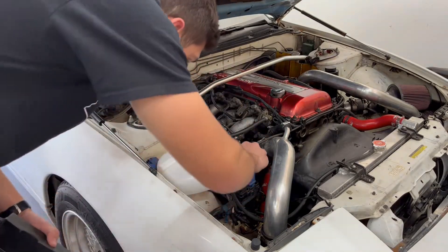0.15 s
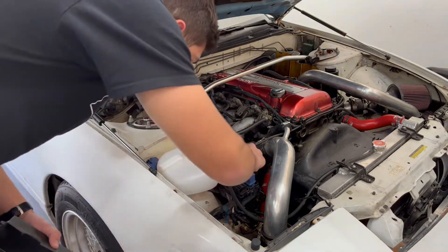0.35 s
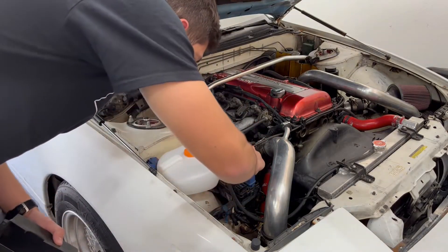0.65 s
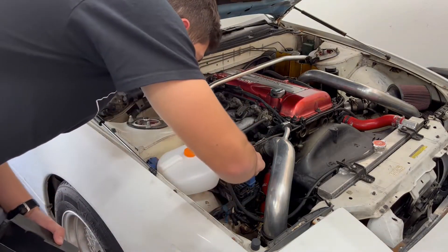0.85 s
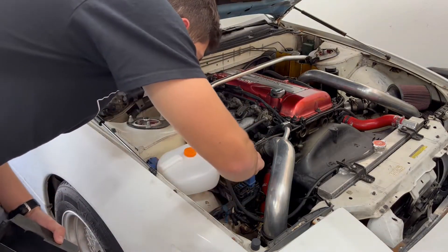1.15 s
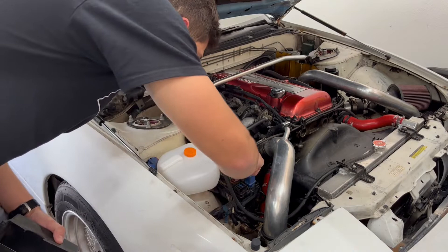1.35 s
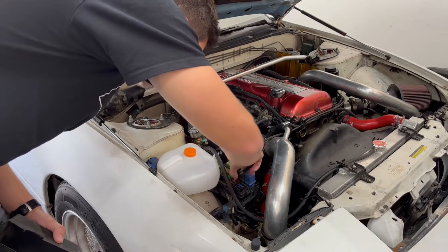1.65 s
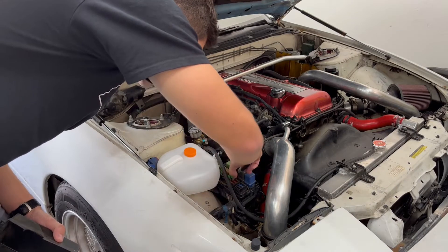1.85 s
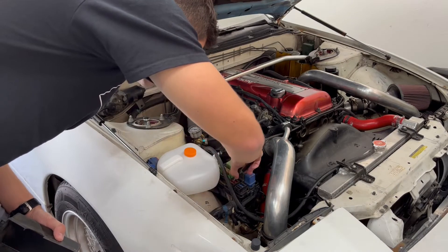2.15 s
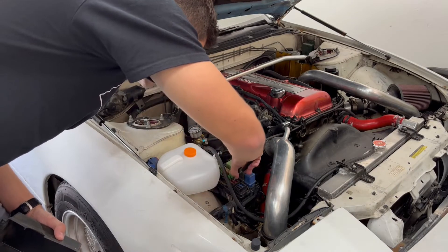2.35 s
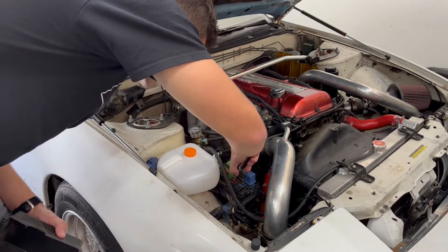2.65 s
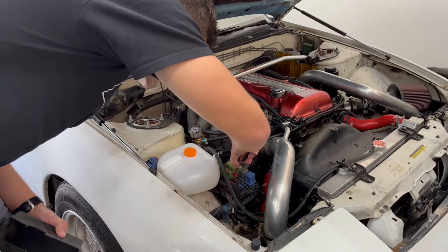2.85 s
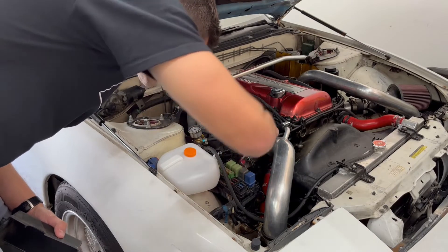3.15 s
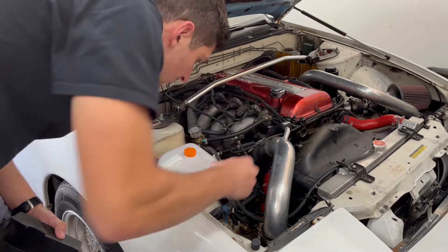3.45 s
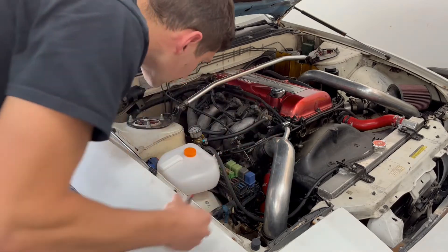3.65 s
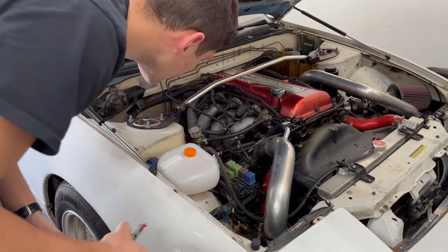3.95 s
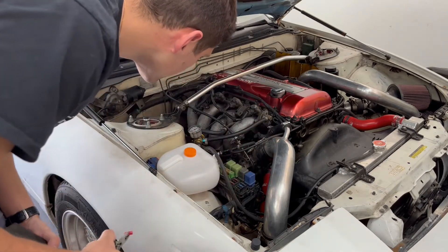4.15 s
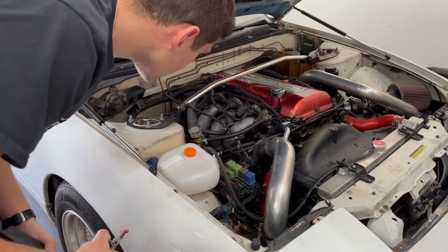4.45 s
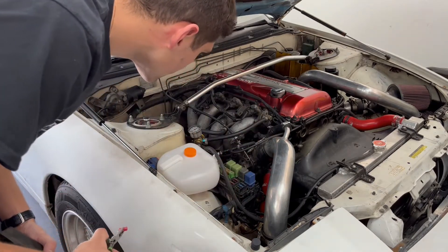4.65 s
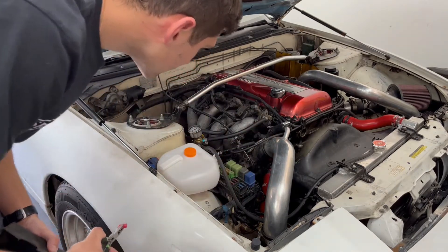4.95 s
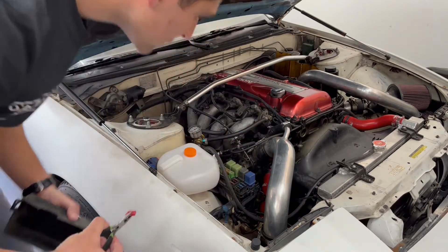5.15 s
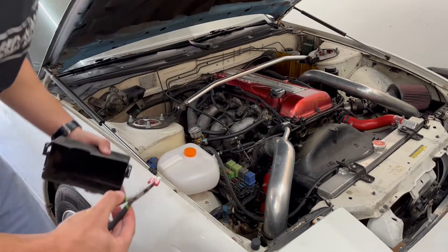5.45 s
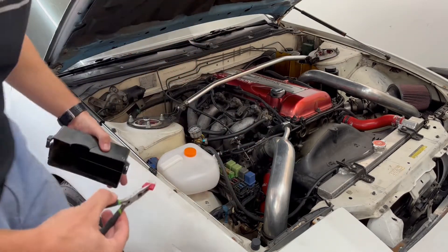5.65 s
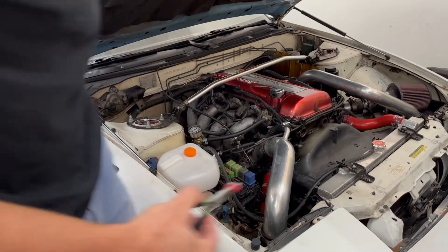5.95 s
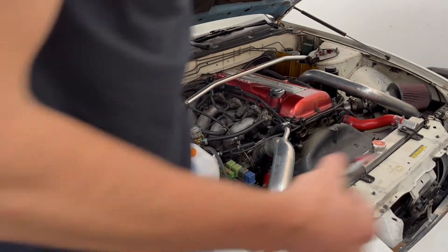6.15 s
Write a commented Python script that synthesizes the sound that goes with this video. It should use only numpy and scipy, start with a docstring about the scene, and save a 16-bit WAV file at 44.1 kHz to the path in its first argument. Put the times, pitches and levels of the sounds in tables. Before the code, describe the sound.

A four-cylinder petrol engine idles in a garage, heard close to the open bonnet. Its low, slightly wavering hum carries quick, light ticking, a belt rumble and a steady intake hiss, with a dull bump near the start. About halfway through, the engine begins to slow and weaken. It sputters through a few uneven strokes and dies, clattering as it rocks on its mounts.

```python
"""A low, even throb with quick ticking: a four-cylinder petrol engine idles under an open bonnet in a
garage, runs short of fuel, slows and dies. Each exhaust stroke excites the modes of the pipe; valves and
injectors tick once a firing. Behind them the body booms, belts and valve gear rumble and whine, and the
intake hisses. A dull bump sounds early on; at the end the block rocks on its mounts and clatters."""
import sys
import numpy as np
from scipy import signal
from scipy.fft import rfft, irfft
from scipy.io import wavfile
from scipy.ndimage import uniform_filter1d

SR = 44100
rng = np.random.default_rng(int(sys.argv[2]) if len(sys.argv) > 2 else 0)


def generate_wav(signal):
    """Clip the signal to [-1, 1] and save it as 16-bit WAV at the path in sys.argv[1]."""
    frames = np.transpose(np.atleast_2d(signal))
    scaled = np.clip(frames, -1, 1) * 32767
    pcm = np.round(scaled).astype(np.int16)
    wavfile.write(sys.argv[1], SR, pcm)


N = 278270

# The crankshaft while it turns smoothly. Each row: time in seconds, firings per second.
FIRING_RATE = [(-.0785, 34.61), (.45, 35.35), (.75, 34.42), (1.8, 34.74), (2.05, 36.29), (2.5, 36.13),
               (2.62, 34.68), (2.97, 35.74), (3.17, 32.34), (3.5, 32.25), (3.85, 30.19), (4.34, 28.31),
               (4.75, 23.8), (5.1, 18.7), (5.4, 12.14)]
# The last lurches over compression. Each entry: time in seconds.
LURCHES = [5.4445, 5.5263, 5.6047, 5.69, 5.7917, 5.9135, 6.0167, 6.128]
# Hum of the running exhaust. Each row: time in seconds, level in dB.
EXHAUST_HUM = [(0.0, -18.5), (0.2, -22), (0.7, -22), (1.03, -23), (1.35, -21.5), (1.57, -23.5),
               (2.3, -18.5), (2.54, -19), (2.61, -22.5), (2.99, -21.5), (3.25, -26), (3.65, -25),
               (3.9, -21.5), (4.3, -21.5), (4.62, -28), (4.84, -26.5), (5.14, -30.5), (5.27, -37)]
# The last uneven strokes. Each row: start in seconds, level in dB, signed weight (push +, suck -).
SPUTTER_STROKES = [(5.291, -44, 0.42), (5.366, -40.5, -0.85), (5.446, -28.5, 0.75), (5.528, -29.5, 0.89),
                   (5.607, -27.5, 0.77), (5.69, -34, -0.89), (5.783, -33.5, 0.55), (5.893, -41, 1),
                   (6.016, -29, 0.69), (6.113, -42, -0.91), (6.243, -48, 0.94)]
# Modes of pipe and garage. Each row: frequency in Hz, gain in dB, 60 dB decay time in seconds.
PIPE_MODES = [(28.8, -13, 0.33), (68.5, 0, 0.14), (107.9, 2, 0.34), (119.4, 9, 0.28), (139.85, -5, 0.41),
              (161, -65, 0.28), (215.7, -16.5, 0.44), (325.5, -10.5, 0.36)]
# Bands of the cylinder head. Each row: centre in Hz, width in Hz, gain in dB, 60 dB decay time in seconds.
HEAD_BANDS = [(3510, 820, 2.5, 0.074), (5700, 1200, -3.5, 0.079), (6500, 410, -7, 0.12),
              (8850, 490, 2.5, 0.033), (13600, 800, -2.5, 0.021), (15200, 1100, -13, .022)]
# Injector pings, fading as fuel pressure is lost. Each row: time in seconds, level before filtering in dB.
INJECTOR_LEVEL = [(0, -32), (1.3, -32), (2.0, -35), (2.7, -36), (2.95, -48), (6.31, -50)]
# The cylinders differ in force. Each entry: relative level of one cylinder in dB.
CYLINDER_EXHAUST_DB = [0.4, -0.68, 0.16, -0.19]
CYLINDER_VALVE_DB = [-3, -5.5, -2.5, -1.5]
CYLINDER_INJECTOR_DB = [-6, -2, 3, -11]
CYLINDER_BRIGHT_DB, CYLINDER_BOOM_DB = [2.5, -2, -3.5, -10], [-12, 0, -3, -12]
# The block rocking on its mounts. Each row: start in seconds, strength in dB.
BLOCK_ROCKS = [(5.529, -37.5), (5.597, -29.5), (5.693, -41), (5.757, -33.5), (5.853, -28.5), (5.989, -33.5),
               (6.082, -28), (6.189, -26.5)]
# Contacts within one rock. Each row: delay in seconds, relative level in dB.
ROCK_CONTACTS = [(0, 3), (.021, -1.5), (0.051, -7.5)]
# Resonances of the brackets. Each row: centre in Hz, width in Hz, gain in dB.
BRACKET_BANDS = [(285, 65, 3), (402, 73, 4), (618, 113, -1.5), (948, 120, 2), (1400, 620, -6),
                 (2000, 850, -8.5), (3600, 4400, -23.5)]
# Resonances of the bay's sheet metal. Each row: centre in Hz, width in Hz, gain in dB.
PANEL_BANDS = [(211.5, 25, 1), (348, 19, 1), (622, 18, 2), (801, 15, -0.5), (1580, 7, 5.5), (1880, 14, 2.5)]
# Belt-driven whine. Each row: time in seconds, level in dB.
WHINE_LEVEL = [(0, -52.5), (1.7, -60), (2.0, -47), (2.5, -50), (3.1, -55), (3.4, -51), (3.65, -56),
               (3.85, -46.5), (4.25, -51), (4.55, -60)]
# Noise spectra of body, machinery, intake and room. Each row: frequency in Hz, relative density in dB.
BOOM_SPECTRUM = [(110, -26), (150, 6.5), (172, -6), (195, -5), (228, 3), (262, -14.5), (330, -38)]
RUMBLE_SPECTRUM = [(160, -4.5), (265, -7), (340, -0.5), (411, -9), (465, -9.5), (579, -11), (636, -9.5),
                   (744, -12), (800, -8), (965, -12.5), (1820, -16), (3200, -26), (4160, -89), (7040, -120)]
INTAKE_SPECTRUM = [(1290, -20.5), (2200, 0.5), (2750, -2.5), (3720, -1.5), (4490, -3.5), (4880, -2.5),
                   (7180, -9), (8890, -5), (10700, -15), (11700, -22.5), (13700, -20), (15700, -24)]
GARAGE_SPECTRUM = [(15, 1), (30, -4), (60, -27), (100, 10), (180, -35)]
# A dull bump. One row: start in seconds, level in dB, frequency in Hz.
LOW_BUMP = (.207, -19, 36)
# Speed laws. Each pair: gain at idle in dB, loss in dB per halving of speed (ticks gain instead).
BOOM_LAW, RUMBLE_LAW, CLATTER_LAW, HISS_LAW = (-38, 8.8), (-37, 7.84), (-37, 15.7), (-47, 8.6)
DULL_TICK_LAW, BRIGHT_TICK_LAW = (-37.5, -2.1), (-35.5, -3)


def firings():
    """Phase is the integral of rate: each whole cycle is a firing. Returns their times and the rate."""
    s, rate = np.transpose(FIRING_RATE)
    t = np.arange(s[0], s[-1], 1 / SR)
    cycles = np.cumsum(np.interp(t, s, rate)) / SR
    fired = np.r_[np.interp(np.arange(int(cycles[-1]) + 1), cycles, t), LURCHES]
    return fired, np.interp(np.arange(N) / SR, fired, 1 / np.gradient(fired))


def exhaust(fired, uneven_db=1.2, jitter_s=.00015, travel_s=.023):
    """Forced vibration: a nearly periodic train of strokes drives the pipe into a hum."""
    chance = rng.standard_normal((len(fired), 2))
    lead_s = 0.2257 * np.gradient(fired)   # the exhaust valve opens ahead of the injector
    arrivals = fired - lead_s + travel_s + jitter_s * chance[:, 0]
    force = amp(by_cylinder(fired, CYLINDER_EXHAUST_DB) + uneven_db * chance[:, 1])
    running = arrivals < EXHAUST_HUM[-1][0]
    run_in = SR // 10   # the pipe is already ringing at the start
    hum = pipe(clicks(arrivals, force * running, run_in), soft_hz=220)[run_in:]
    power = uniform_filter1d(hum ** 2, size=5000) + 0.29 * np.mean(hum ** 2)
    return amp(in_time(EXHAUST_HUM)) * hum / np.sqrt(power)


def sputters():
    """Impulse response: each last stroke rings the pipe and draws a thud from the car body."""
    s, db, weight = np.transpose(SPUTTER_STROKES)
    strokes = clicks(s, weight * amp(db))
    thuds = amp(-1) * ring(strokes, hz=58.4, t60=.09)
    return amp(-8.5) * pipe(strokes, soft_hz=194) + thuds


def pipe(strokes, soft_hz, echo_s=.0294, echo_db=-23):
    """Modal superposition: soft pressure pulses ring the pipe, and the garage wall reflects the sound."""
    pressure = signal.sosfilt(signal.butter(2, soft_hz, fs=SR, output="sos"), strokes + 1e-18)
    direct = sum(amp(db) * ring(pressure, hz, t60) for hz, db, t60 in PIPE_MODES)
    lag = int(echo_s * SR)
    return direct + amp(echo_db) * np.r_[np.zeros(lag), direct[:-lag]]


def valves(fired, rate, bright_from_hz=8000):
    """Impact excitation: valves tick in the bands of the cylinder head; the high bands die first."""
    out = 0
    for hz, width, db, t60 in HEAD_BANDS:
        bright = hz > bright_from_hz
        cylinder_db = np.add(CYLINDER_VALVE_DB, CYLINDER_BRIGHT_DB) if bright else CYLINDER_VALVE_DB
        taps = ticks(fired, cylinder_db, spread_db=2.6, t60=t60)
        gain = with_speed(BRIGHT_TICK_LAW if bright else DULL_TICK_LAW, rate)
        out = out + gain * amp(db) * resonance(taps, hz, width)
    return out


def injectors(fired, hz=13400, width_hz=700):
    """Resonant filtering: two resonances in series narrow each injector tick to a thin ping."""
    taps = ticks(fired, CYLINDER_INJECTOR_DB, spread_db=1.2, t60=.03)
    pings = resonance(resonance(taps, hz, width_hz), hz, 2 * width_hz)
    return amp(in_time(INJECTOR_LEVEL)) * pings


def rocking_block(knock_db=23):
    """Rebound: each rock makes three rattling contacts that excite the brackets' resonances."""
    s, rock_db = np.transpose(BLOCK_ROCKS)
    contacts = sum(clicks(s + delay, amp(rock_db + db)) for delay, db in ROCK_CONTACTS)
    garage_tail = amp(-22) * fade(contacts, t60=.6)
    envelope = swell(fade(contacts, t60=.12) + garage_tail, attack_s=.0029)
    rattle = envelope * rng.standard_normal(N) * amp(1.5 * drift(150))
    knocks = clicks(s + ROCK_CONTACTS[1][0], amp(rock_db + knock_db))   # the second contact is hard
    return amp(5) * sum((-1) ** k * amp(db) * resonance(rattle + knocks, hz, width)
                        for k, (hz, width, db) in enumerate(BRACKET_BANDS))


def body_boom(fired, rate):
    """Amplitude modulation: the body's low noise throbs hardest after two neighbouring firings."""
    throb = fade(clicks(fired, amp(by_cylinder(fired, CYLINDER_BOOM_DB))), t60=.22)
    throb = throb / np.sqrt(uniform_filter1d(throb ** 2, size=12000))
    return with_speed(BOOM_LAW, rate) * throb * coloured(BOOM_SPECTRUM)


def machinery(rate, crossover_hz=1500):
    """Broadband noise of belts and valve gear: with slowing, the clatter thins faster than the rumble."""
    noise = coloured(RUMBLE_SPECTRUM, flicker_db=0.75)
    rumble = signal.sosfiltfilt(signal.butter(2, crossover_hz, fs=SR, output="sos"), noise)
    clatter = noise - rumble
    return with_speed(RUMBLE_LAW, rate) * rumble + with_speed(CLATTER_LAW, rate) * clatter


def panels(x):
    """Sympathetic resonance: the bay's sheet metal colours a few narrow bands."""
    return x + sum((amp(db) - 1) * resonance(x, hz, width) for hz, width, db in PANEL_BANDS)


def intake(fired, rate):
    """Flow noise, modulated: the hiss swells after each firing."""
    puff = 1 + 0.13 * fade(clicks(fired, np.ones(len(fired))), t60=.087)
    return with_speed(HISS_LAW, rate) * rms_one(puff * coloured(INTAKE_SPECTRUM, flicker_db=0.2))


def belt_whine(rate, cycles_per_firing=22.2):
    """A rotational tone: its wavering frequency is proportional to engine speed."""
    sounding = np.arange(N) / SR < WHINE_LEVEL[-1][0]
    phase = 2 * np.pi * np.cumsum(cycles_per_firing * rate) / SR + 1.4 * drift(9)
    return np.sqrt(2) * sounding * amp(in_time(WHINE_LEVEL) + 3.3 * drift(22)) * np.sin(phase)


def bump():
    """Heavy damping: a low oscillation dies within a few swings."""
    s, db, hz = LOW_BUMP
    return -ring(clicks([s], [amp(db)]), hz, t60=.08)


def garage():
    """Stationary noise: the room's faint low rumble."""
    return amp(-51) * coloured(GARAGE_SPECTRUM)


def ticks(fired, cylinder_db, spread_db, t60):
    """Transient noise: one decaying burst at each firing."""
    sizes = amp(by_cylinder(fired, cylinder_db) + spread_db * rng.standard_normal(len(fired)))
    return swell(fade(clicks(fired, sizes), t60), attack_s=.0012) * rng.standard_normal(N)


def by_cylinder(fired, four_db):
    """Cyclic order: the firings take the four levels in turn."""
    return np.array(four_db)[np.arange(len(fired)) % len(four_db)]


def with_speed(law, rate, idle_per_s=35):
    """Power law: the gain changes by equal dB for each halving of speed."""
    idle_db, per_halving_db = law
    return amp(idle_db + per_halving_db * np.log2(rate / idle_per_s))


def clicks(seconds, sizes, run_in=0):
    """An impulse train that begins run_in samples before time zero."""
    at = np.round(np.asarray(seconds) * SR).astype(int) + run_in
    train = np.zeros(N + run_in)
    inside = (at >= 0) & (at < len(train))
    train[at[inside]] = np.asarray(sizes)[inside]
    return train


def ring(x, hz, t60):
    """A damped oscillator: a unit impulse starts a sine of height 1."""
    r, w = amp(-60 / (t60 * SR)), 2 * np.pi * hz / SR
    return signal.lfilter([0, np.sin(w)], [1, -2 * r * np.cos(w), r * r], x + 1e-18)


def resonance(x, hz, width_hz):
    """A band-pass resonator with peak gain 1."""
    r, w = np.exp(-np.pi * width_hz / SR), 2 * np.pi * hz / SR
    return signal.lfilter([(1 - r * r) / 2, 0, (r * r - 1) / 2], [1, -2 * r * np.cos(w), r * r], x)


def fade(x, t60):
    """Exponential decay: each impulse falls 60 dB in t60 seconds."""
    return signal.lfilter([1], [1, -amp(-60 / (t60 * SR))], x + 1e-18)


def swell(envelope, attack_s):
    """A first-order lag softens the rise of an envelope."""
    r = np.exp(-1 / (attack_s * SR))
    return signal.lfilter([1 - r], [1, -r], envelope)


def drift(hz):
    """Low-passed noise: a random wander of rms 1."""
    step = 40   # samples between points
    r = np.exp(-2 * np.pi * hz * step / SR)
    slow = signal.lfilter([1], [1, -2 * r, r * r], rng.standard_normal(N // step + 2002))[2000:]
    return np.interp(np.arange(N) / step, np.arange(len(slow)), rms_one(slow))


def coloured(spectrum, flicker_db=0):
    """Spectral shaping: noise of rms 1 whose level may flicker."""
    hz = np.fft.rfftfreq(N, 1 / SR) + 1
    knots_hz, db = np.transpose(spectrum)
    gain = amp(np.interp(np.log(hz), np.log(knots_hz), db))
    shaped = irfft(rfft(rng.standard_normal(N)) * gain, N)
    return rms_one(shaped * amp(flicker_db * drift(57)))


def in_time(rows):
    """Linear interpolation of a curve at every sample."""
    return np.interp(np.arange(N) / SR, *np.transpose(rows))


def amp(db):
    """Amplitude ratio of a level in dB."""
    return 10 ** (np.asarray(db) / 20)


def rms_one(x):
    """Normalisation to rms 1."""
    return x / np.sqrt(np.mean(x ** 2) + 1e-20)


def scene():
    """Superposition: the pressures of all sources add at one microphone."""
    fired, rate = firings()
    hiss = intake(fired, rate)
    bay = panels(body_boom(fired, rate) + machinery(rate)) + belt_whine(rate)
    tailpipe = exhaust(fired) + sputters()
    ticking = valves(fired, rate) + injectors(fired)
    return (tailpipe + ticking + rocking_block() + bay + hiss + bump() + garage())[None]


def record(dry, low_hz=12, high_hz=15850):
    """Band limiting: the microphone drops the lowest bass and the highest treble."""
    no_bass = signal.sosfilt(signal.butter(2, low_hz, "high", fs=SR, output="sos"), dry)
    return signal.sosfilt(signal.ellip(10, .3, 55, high_hz, fs=SR, output="sos"), no_bass)


dry = scene()
out = record(dry)
generate_wav(out)
```